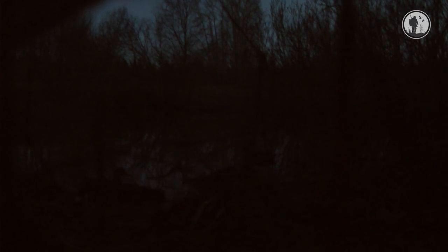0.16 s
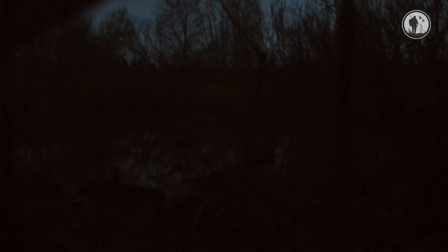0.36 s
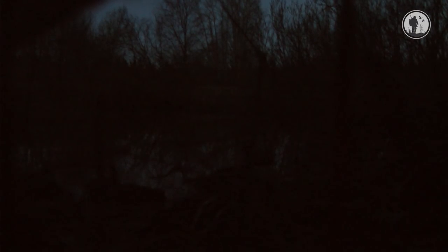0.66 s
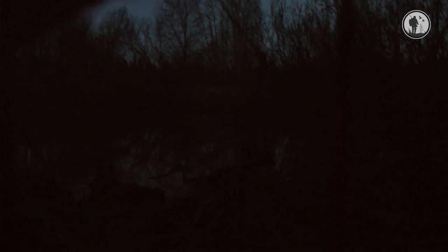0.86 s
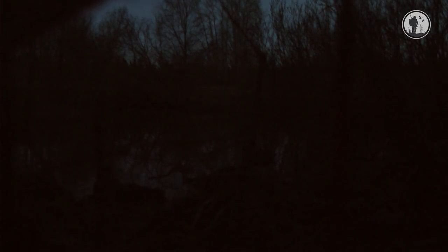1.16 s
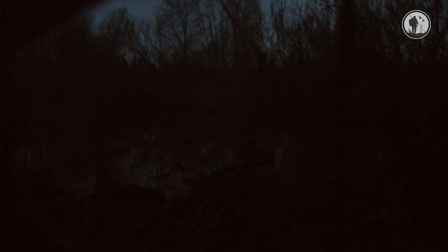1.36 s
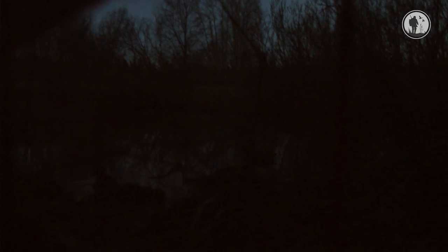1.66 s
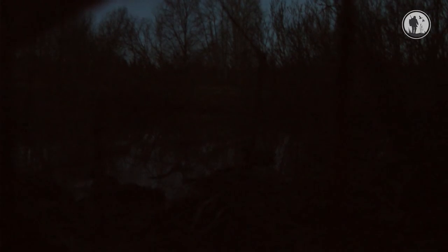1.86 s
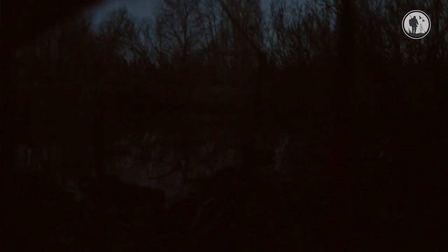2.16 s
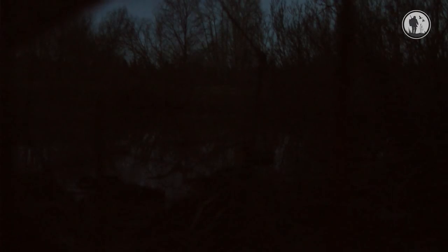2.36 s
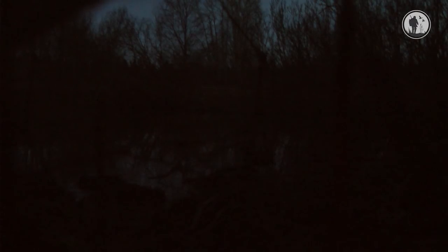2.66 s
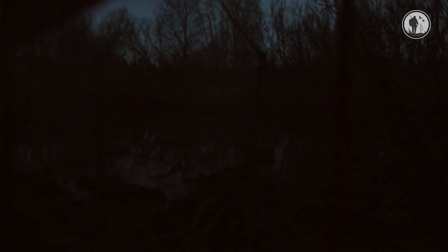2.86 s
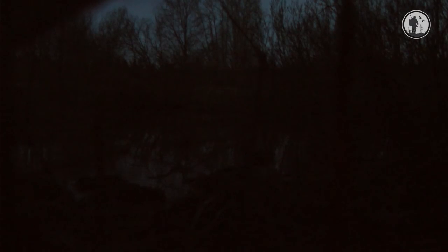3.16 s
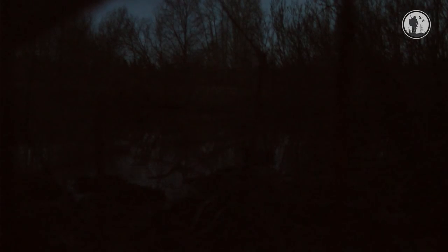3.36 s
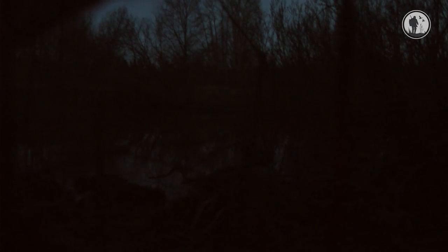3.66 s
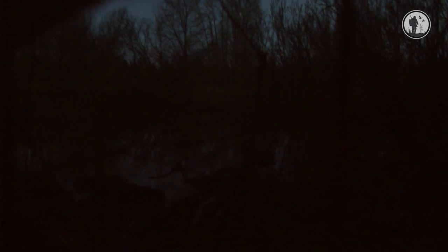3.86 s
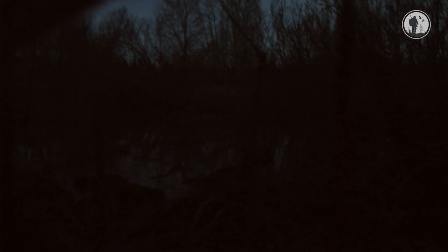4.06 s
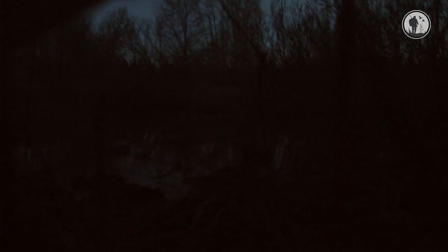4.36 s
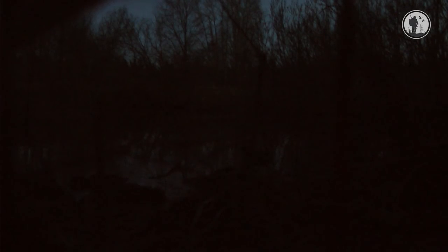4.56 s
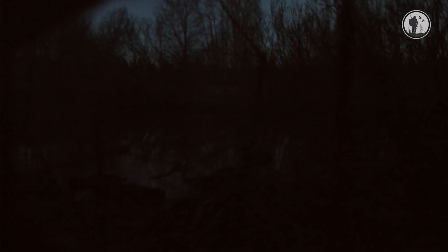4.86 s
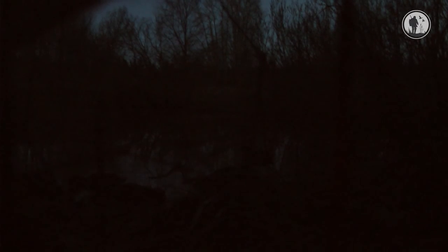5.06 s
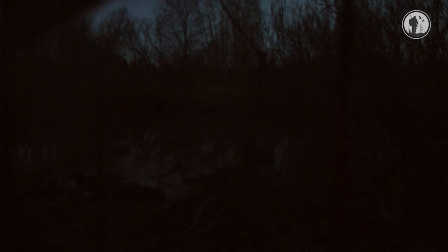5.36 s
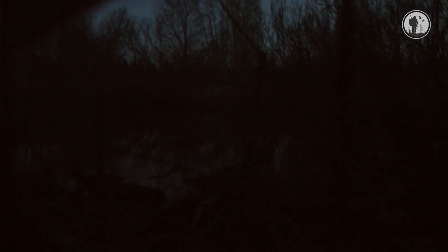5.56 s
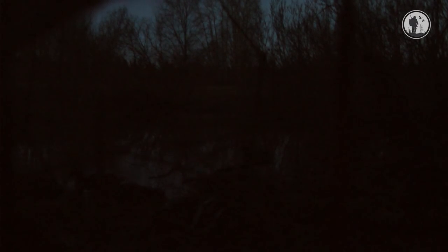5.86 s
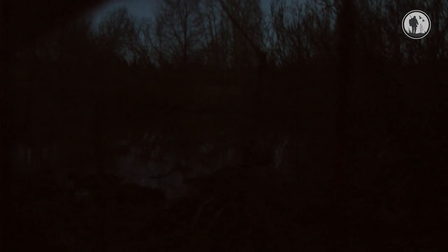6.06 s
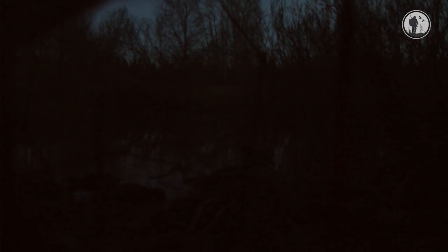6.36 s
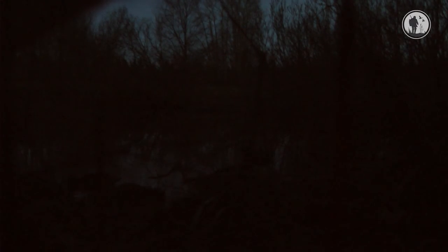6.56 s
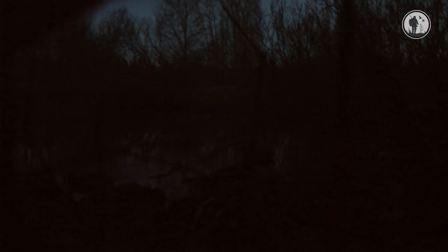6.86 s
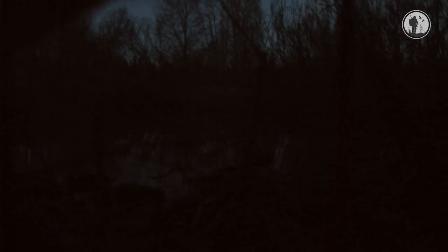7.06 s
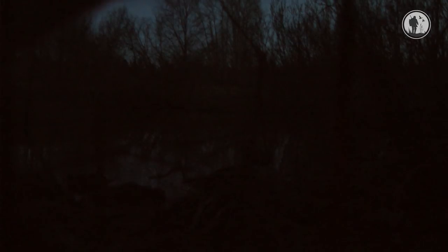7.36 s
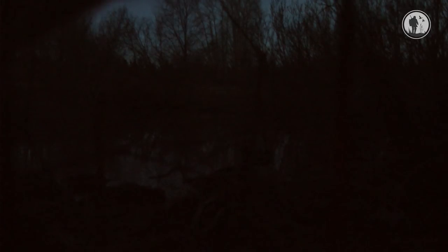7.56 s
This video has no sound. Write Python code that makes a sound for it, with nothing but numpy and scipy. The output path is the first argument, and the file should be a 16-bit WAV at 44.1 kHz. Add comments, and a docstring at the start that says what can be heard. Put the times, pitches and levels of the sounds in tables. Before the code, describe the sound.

A hen duck quacks about twenty times in quick succession, close, centered and dry, turning lower and raspier as she goes. Before she starts, far ducks call and a small bird trills in rising chirps, lightly echoing among the trees. High twitters fade under the quacking, with a few sharp ticks and a faint steady hum. Two small splashes and the returning trill finish it.

```python
"""Dawn in flooded woods, with a thin hum all the way through. At first, over a low drone, far ducks
rasp, small birds whistle among the trunks and one bird trills in rising chirps. After a second a hen
duck close by starts a long, fast run of quacks: membranes in her throat pulse, and her throat and bill
shape the buzz. The drone stops, the whistles thin out and she grows hoarse. A few dry ticks pass;
at the end come two soft splashes and the trill again."""
import sys
import numpy as np
from scipy import signal
from scipy.fft import rfft, irfft
from scipy.io import wavfile
from scipy.ndimage import uniform_filter1d

SR = 44100
rng = np.random.default_rng(int(sys.argv[2]) if len(sys.argv) > 2 else 0)


def wrap_up_sound(samples):
    """Save the sound to the file named by the first command line argument, as 16-bit audio."""
    columns = np.atleast_2d(samples).T
    # keep every value between -1 and 1, then stretch to whole-number steps
    tamed = np.clip(columns, -1, 1)
    steps = np.round(tamed * 32767).astype(np.int16)
    wavfile.write(sys.argv[1], SR, steps)


N = 339570


def amp(db):
    """Turns decibels into a gain."""
    return 10 ** (np.asarray(db) / 20)


def evened(x):
    """Scales x to an average power of 1."""
    return x / np.sqrt(np.mean(x ** 2) + 1e-20)


def at_pitch(points, hz):
    """Reads a curve at the given frequencies."""
    f, value = np.transpose(points)
    return np.interp(np.log(hz + 1), np.log(f + 1), value)


def at_time(points, s):
    """Reads a curve at the given times."""
    return np.interp(s, *np.transpose(points))


def add(mix, start_s, sound):
    """Adds a sound to the mix at start_s."""
    part = mix[round(start_s * SR):][:len(sound)]
    part += sound[:len(part)]


def arch(progress, top):
    """How far progress lies before and after the top, each from 0 to 1."""
    top = np.clip(top, .05, .95)
    return np.maximum(1 - progress / top, 0), np.maximum((progress - top) / (1 - top), 0)


def resonate(x, hz, width_hz):
    """A resonance: shifts hz down to zero, smooths, and shifts back."""
    turn = np.exp(2j * np.pi * hz * np.arange(len(x)) / SR)
    decay = np.exp(-np.pi * width_hz / SR)
    return 2 * (turn * signal.lfilter([1 - decay], [1, -decay], x / turn)).real


def colour(x, spectrum, lo_hz, hi_hz, steep=20):
    """Shapes x with one band of a spectrum, at power 1."""
    hz = np.fft.rfftfreq(len(x), 1 / SR) + 1
    band = 1 / np.sqrt((1 + (lo_hz / hz) ** steep) * (1 + (hz / hi_hz) ** steep))
    return evened(irfft(rfft(x) * amp(at_pitch(spectrum, hz)) * band, len(x)))


def noise(spectrum, patchy_db):
    """Stereo noise with drifting louder and softer patches."""
    # how alike left and right are: pitch_hz, likeness (1 = the same)
    likeness = [(30, 1), (125, 0.96), (500, 0.44), (2000, 0.96), (8000, 0.91), (14000, 0.34)]
    hz = np.fft.rfftfreq(2048, 1 / SR)
    a, b, c, d, patches = rng.standard_normal((N // 512 + 5, 1025, 5)).T
    patches = evened(uniform_filter1d(uniform_filter1d(patches, size=16, axis=0), size=6, axis=1))
    same = np.clip(at_pitch(likeness, hz), -1, 1)[:, None]
    left = a + 1j * b
    right = same * left + np.sqrt(1 - same ** 2) * (c + 1j * d)
    frames = np.array([left, right]) * amp(at_pitch(spectrum, hz)[:, None] + patchy_db * patches)
    return evened(signal.istft(frames, nperseg=2048, noverlap=1536)[1][:, :N])


def still_air():
    """A soft, even wash of noise."""
    # colour of the air: pitch_hz, level_db
    spectrum = [(12, -93), (20, -3), (74, -11), (191, -1.5), (324, -2), (393, -6.5), (1160, -11),
                (1380, -16), (1720, -9), (2920, -9), (4070, -16.5), (6720, -47), (15500, -31)]
    return amp(-60.5) * noise(spectrum, patchy_db=2)


def drone(t, end_s=2.56):
    """Two low, wobbling tones and a rumble that stop short."""
    # the tones: pitch_hz, level_db
    pitches = [(49, -53), (81, -64.5)]
    # colour of the rumble: pitch_hz, level_db
    spectrum = [(20, -11), (40, -50), (62, -0.5), (100, 5), (125, -2.5), (200, -3.5), (300, -17.5),
                (600, -17), (1300, -14.5), (2500, -38)]
    wobble = .22 * np.sin(2 * np.pi * 2.21 * t)
    tones = sum(amp(db) * np.sqrt(2) * np.sin(2 * np.pi * (hz * t + wobble)) for hz, db in pitches)
    rumble = amp(-51) * noise(spectrum, patchy_db=4.5)
    return (tones + rumble) * np.clip((end_s - t) / .023, 0, 1)


def hiss(t):
    """High noise that dips, swells and fades."""
    # loudness of the hiss: time_s, level_db
    levels = [(0, -62), (.3, -78), (.7, -74), (2.5, -61), (3.3, -66), (3.9, -76)]
    return amp(at_time(levels, t)) * noise([(2000, -15), (5000, 14.5), (15000, 12)], patchy_db=3.5)


def hum(t):
    """Two thin tones; a narrow band of noise around each makes it waver."""
    # the tones: pitch_hz, level_db
    tones = [(737, -64.5), (1325, -88)]
    out = np.zeros(N)
    for hz, db in tones:
        waver = evened(resonate(rng.standard_normal(N), hz, width_hz=14))
        out += amp(db) * (np.sin(2 * np.pi * hz * t) + .4 * waver)
    return out


def woods(x, ring_s, spread):
    """Echoes off the trunks: many small copies, partly different left and right."""
    size = SR // 2
    taps = np.zeros((2, size))
    delays = np.arange(200, size - 20, 20) + rng.integers(0, 20, (2, (size - 201) // 20))
    np.put_along_axis(taps, delays, rng.choice([-1., 1.], delays.shape), 1)
    fade = amp(-60 * np.arange(size) / SR / ring_s)
    echoes = (taps[0] + spread * taps[1] * np.array([[1], [-1]])) * fade
    return signal.fftconvolve(x[None], echoes / np.linalg.norm(echoes[0]), axes=1)[:, :N]


def ticks():
    """Dry ticks: bright noise that dies almost at once."""
    # each tick: start_s, level_db
    hits = [(2.9149, -35), (2.9756, -32), (4.969, -43), (5.8077, -29)]
    out, t = np.zeros(N), np.arange(400) / SR
    for start_s, db in hits:
        bright = signal.lfilter([1, 0, -1], [1, -.3], rng.standard_normal(len(t))) / 3
        add(out, start_s, amp(db - 60 * t / .0057) * bright)
    return out


def splashes():
    """Soft splashes: short, dull puffs of noise."""
    # each splash: start_s, length_s, level_db
    plops = [(7.165, 0.042, -47), (7.48, 0.042, -50.5)]
    out = np.zeros(N)
    for start_s, length_s, db in plops:
        white = rng.standard_normal(round(length_s * SR))
        puff = colour(white, [(100, 22), (4000, -12)], lo_hz=256, hi_hz=1290, steep=16)
        add(out, start_s, amp(db) * puff * np.hanning(len(puff)))
    return out


def whistle(hz, level_db, taper, fuzz, overtones=None):
    """A bird's tone; taper softens its ends and fuzz makes its level flutter."""
    # a nearly pure tone: pitch_multiple, level_db
    nearly_pure = [(1, 0), (2, -32), (3, -40)]
    turns = np.cumsum(hz) / SR
    tone = sum(amp(db) * np.sin(2 * np.pi * k * turns) * (k * hz < SR / 2.2)
               for k, db in overtones or nearly_pure)
    drift = uniform_filter1d(uniform_filter1d(rng.standard_normal(len(hz)), size=90), size=90)
    flutter = evened(1 + fuzz * evened(drift))
    return np.sqrt(2) * amp(level_db) * tone * flutter * signal.windows.tukey(len(hz), taper)


def glides(rows, taper, fuzz, fade_db):
    """One sliding whistle for each row; a bend over 1 makes the slide come late."""
    out = np.zeros(N)
    for start_s, length_s, start_hz, end_hz, db, bend in rows:
        progress = np.arange(0, 1, 1 / (length_s * SR))
        hz = start_hz + (end_hz - start_hz) * progress ** bend
        add(out, start_s, whistle(hz, db - fade_db * (progress - .5), taper, fuzz))
    return out


def squeals():
    """Far squeals and whistles, blurred by the trees."""
    # each call: start_s, length_s, start_hz, end_hz, level_db, bend
    calls = [ (.03, 0.24, 1400, 1817, -47.5, 0.41), (.09, 0.071, 3530, 4100, -53, 1.05),
             (.18, 0.044, 3120, 2960, -53, 1), (.28, 0.046, 3100, 4430, -46, 1.55),
             (.315, 0.097, 4470, 4350, -56.5, 0.64), (.4, 0.26, 4460, 4440, -72, 1.3),
             (.328, 0.039, 4450, 3000, -48, 0.34), (.36, 0.07, 3570, 3010, -51.5, 0.9),
             (.285, 0.049, 483, 660, -52.5, 0.85), (.64, 0.044, 466, 720, -55, 0.94),
             (.81, 0.16, 5030, 3700, -58, 0.61), (1.21, 0.03, 4350, 4060, -46, 1.1),
             (1.28, 0.032, 4300, 4500, -47.5, 0.19), (1.36, 0.069, 4450, 4410, -50, .2),
             (1.493, 0.008, 5950, 3500, -40, 0.53), (1.524, 0.021, 3900, 5870, -46, 2),
             (1.985, 0.025, 5500, 4160, -42, 1.15), (2.26, 0.11, 3670, 2785, -44, 0.45),
             (2.27, 0.044, 8260, 7350, -50, 1.4), (2.84, 0.069, 3800, 3686, -57, 0.84),
             (2.885, 0.053, 2950, 6150, -48, 4.9), (3.13, 0.06, 7520, 7240, -59, 1.1),
             (3.19, 0.021, 7300, 4140, -55, 0.82), (3.222, 0.018, 7360, 4270, -54, 1.5),
             (3.17, 0.033, 4640, 3080, -56, 3.7), (3.76, 0.042, 3700, 2640, -58.5, 2.2),
             (5.2, 0.12, 3000, 2800, -68, 2), (5.49, 0.18, 3100, 3400, -74, 0.37),
             (6.07, 0.032, 3570, 3560, -68, 1)]
    return glides(calls, taper=.5, fuzz=.9, fade_db=12)


def twitter():
    """Tiny, steep chirps scattered at random, high in the trees."""
    # the loudest a chirp can be: time_s, level_db
    levels = [(1.4, -92), (1.5, -56), (1.75, -46.5), (2.05, -57), (2.3, -53), (2.6, -61), (3.0, -56),
              (3.3, -56)]
    out, progress = np.zeros(N), np.linspace(0, 1, 600)
    for when, pitch, slide, softness in rng.random((420, 4)):
        start_s = 1.4 + 1.9 * when
        hz = (2800 + 5200 * pitch) * (1 + .5 * (slide - .5) * progress)
        add(out, start_s, whistle(hz, at_time(levels, start_s) - 6 * softness, taper=.8, fuzz=1))
    return out


def squeak(length_s=.112, top_hz=2470):
    """One rich squeak whose pitch rises, holds and falls."""
    # its overtones: pitch_multiple, level_db
    overtones = [(1, -4), (2, 3), (3, 1), (4, -11), (5, -19), (6, -13)]
    before, after = arch(np.arange(0, 1, 1 / (length_s * SR)), top=.6)
    hz = top_hz * (1 - .15 * (before + after) ** 4)
    return whistle(hz, level_db=-51, taper=.5, fuzz=.3, overtones=overtones)


def trill(chirp_start_hz=2532, gap_s=.0018):
    """A bird sings in groups: a swelling lead-in, then quick rising chirps."""
    # each group: start_s, lead_s, lead_start_hz, lead_bend, lead_db, chirp_count, top_hz, chirp_db
    groups = [(.512, 0.018, 2540, 1.04, -45, 2, 3520, -37.5), (0.644, .05, 2200, 2.3, -40.5, 2, 3650, -32),
              (0.781, 0.043, 2334, 1.17, -35, 2, 3440, -27.5),
              (.908, .034, 2410, 1.5, -32.5, 2, 3610, -26.5), (1.02, .032, 2650, 1.3, -30.5, 0, 3283, -28),
              (1.504, 0.017, 3080, 1.1, -42.5, 1, 3380, -41),
              (7.501, .041, 2230, 2.94, -38.5, 3, 3590, -31.5), (7.631, .041, 2370, 2, -34.5, 2, 3590, -26)]
    leads, chirps = [], []
    for start_s, lead_s, lead_hz, bend, lead_db, count, top_hz, chirp_db in groups:
        leads.append((start_s, lead_s, lead_hz, top_hz, lead_db, bend))
        for k in range(round(count)):  # each chirp comes sooner, and tires: shorter, lower, softer
            chirp_s = start_s + lead_s + gap_s + k * (.023 - .0015 * k)
            length_s = .01394 - .0007 * k
            chirps.append((chirp_s, length_s, chirp_start_hz, top_hz - 151 * k, chirp_db - 2.5 * k, .957))
    return glides(leads, taper=.4, fuzz=.1, fade_db=-18) + glides(chirps, taper=.7, fuzz=.1, fade_db=0)


def warble(start_s, length_s=.44, dip_width_s=.009):
    """The trill runs out in a climbing, fading whistle with short, loud dips in pitch."""
    # each dip: time_s, depth_hz, swell_db
    dip_rows = [(1.063, 180, 11.5), (1.082, 150, 3), (1.137, 302, 15), (1.176, 91.5, 1), (1.213, 505, 13.5),
                (1.292, 195, 11)]
    dip_s, depth_hz, swell_db = np.transpose(dip_rows)
    t = np.arange(0, length_s, 1 / SR)
    dips = np.exp(-((t[:, None] + start_s - dip_s) / dip_width_s) ** 2)
    hz = 3370 + 466 * t / length_s - dips @ depth_hz
    level_db = -38.5 - 11 * t / length_s + dips @ swell_db
    return whistle(hz, level_db, taper=.12, fuzz=.6)


def birds(squeak_s=2.578, warble_s=1.05):
    """All the small birds together."""
    out = trill() + squeals()
    add(out, squeak_s, squeak())
    add(out, warble_s, warble(warble_s))
    return out + twitter()


def rasp(turns, clear_share, burst, uneven_db):
    """A duck's membranes pulse unevenly, each with a puff of air. Gives the mix, and the puffs alone."""
    chance = np.clip(rng.standard_normal(int(turns[-1]) + 2), -1.4, 1.4)
    strength = amp(uneven_db * chance)[(turns + .5).astype(int)]
    pulses = sum(np.cos(2 * np.pi * k * (turns + k / 40)) for k in range(3, 13))  # k / 40 smears them
    puffs = (.88 + np.exp(-(turns % 1) / burst)) * rng.standard_normal(len(turns))
    buzz = np.sqrt(clear_share) * evened(pulses) + np.sqrt(1 - clear_share) * evened(puffs)
    return strength * buzz, strength * puffs


def far_ducks(pulse_hz=215, rise_db=20.5, fall_db=4.5):
    """Distance leaves only two throat resonances of each duck's rasp."""
    # each call: start_s, length_s, top_place (0-1), level_db
    calls = [(0.081, 0.31, 0.44, -33), (0.362, 0.23, 0.28, -41.5), (0.964, 0.28, 0.37, -33.5),
             (1.426, .12, 0.8, -36.5), (1.705, 0.089, 1, -37)]
    # throat resonances: pitch_hz, width_hz, level_db
    resonances = [(2076, 224, 20.5), (2258, 260, 22)]
    out = np.zeros(N)
    for start_s, length_s, top, top_db in calls:
        t = np.arange(0, length_s, 1 / SR)
        before, after = arch(t / length_s, top)
        buzz, _ = rasp(t * pulse_hz, clear_share=.1, burst=.38, uneven_db=3)
        throat = sum(amp(db) * resonate(resonate(buzz, hz, width), hz, width)
                     for hz, width, db in resonances)
        level = amp(top_db - rise_db * before - fall_db * after)
        add(out, start_s, level * evened(throat) * signal.windows.tukey(len(t), .1))
    return out


def envelope(t, from_top, attack_s, attack_db, release_s, release_db, droop_db):
    """A level in dB that rises, droops away from the top of the quack, then falls."""
    rise = np.maximum(1 - t / attack_s, 0)
    fall = np.maximum(1 - (t[-1] - t) / release_s, 0)
    return -attack_db * rise ** 1.58 - release_db * fall ** 1.4 - droop_db * from_top


def hen_voice(start_s, turns, tone_db):
    """The membranes give clear low tones with breath. Gives that voice, the buzz and the puffs."""
    # low tones (the half steps come from strong-weak pulses): pitch_multiple, level_db
    low_tones = [(1, 1), (1.5, -16), (2, -3.5), (2.5, -24), (3, -14)]
    # breath noise as she grows hoarse: time_s, level_db
    hoarseness = [(1.3, 4), (1.6, -14.5), (2.5, -12.5), (3.3, -7.5), (5.1, -3.5), (5.4, -3.5), (7.1, -5),
                  (7.4, 3.5)]
    # colour of the breath: pitch_hz, level_db
    breath_colour = [(200, -18), (330, 0.5), (650, 0), (1000, -2.5), (1250, -0.5), (1420, -30)]
    # how much of the buzz is clean pulses: time_s, share (0-1)
    clearness = [(1.3, .08), (1.6, .4), (2.5, .35), (3.3, .2), (5.1, .17), (5.4, .22), (7.1, .17),
                 (7.4, .08)]
    tones = sum(amp(db + tone_db) * np.sqrt(2) * np.cos(2 * np.pi * k * turns) for k, db in low_tones)
    buzz, puffs = rasp(turns, at_time(clearness, start_s), burst=.67, uneven_db=2.5)
    breath = colour(puffs, breath_colour, lo_hz=198, hi_hz=1490, steep=12)
    return tones + amp(at_time(hoarseness, start_s)) * breath, buzz, puffs


def throat_bill_nose(start_s, aside, buzz, puffs):
    """Throat, bill and nose each shape a band of the rasp; the colour changes as her head turns."""
    # throat and bill, head aside or facing us: pitch_hz, level_db
    aside_mouth = [(1350, 3), (1530, -2.5), (1750, 7.5), (2150, -3), (2590, -11), (2950, -2), (3250, -4),
                   (3700, -18), (4250, -22.5)]
    facing_mouth = [(1300, -53), (1470, -7.5), (1750, 7), (2050, 6.5), (2380, -3), (2600, -11.5),
                    (2800, -5), (3200, -11.5), (3600, -26.5), (4150, -38)]
    # nasal treble, aside, later aside (narrower bands) or facing us: pitch_hz, level_db
    aside_nose = [(3600, 4), (4200, -6.5), (4800, -7.5), (5300, -6), (5800, -5), (6330, -1.5), (7290, -2.5),
                  (7900, -20), (8600, -12.5), (9800, -16.5), (12500, -28), (15500, -41)]
    late_nose = [(3600, -27), (4500, -10), (5200, -8.5), (5800, -1.5), (6500, 1.5), (7300, -9.5),
                 (8500, -22), (9900, -10), (11000, -24), (12500, -33), (15500, -45)]
    facing_nose = [(3600, -11), (4250, -16.5), (4600, -4.5), (5340, -4), (6050, -15.5), (6500, -12),
                   (7350, -19.5), (7900, -19), (10300, -23.5), (12500, -35.5), (15500, -42)]
    mouth, nose = facing_mouth, facing_nose
    if aside:
        mouth, nose = aside_mouth, (late_nose if start_s > 4.1 else aside_nose)
    return (colour(buzz, mouth, lo_hz=1350, hi_hz=2450),
            colour(buzz, mouth, lo_hz=2460, hi_hz=4250),
            colour(puffs, nose, lo_hz=4250, hi_hz=18000))


def quack(start_s, length_s, top_hz, top, voice_db, throat_db, throat_fade_db, swell_db,
          bill_db, bill_fade_db):
    """One quack: a voice that arches in pitch, with rasp from throat, bill and nose."""
    # level shapes of voice, throat and bill: attack_s, attack_db, release_s, release_db, droop_db
    aside_shapes = [(0.025, 4.5, 0.025, 26, 5), (0.018, 17.5, 0.031, 14, 6), (0.039, 14, 0.044, 4.5, 22)]
    facing_shapes = [(.045, 5.8, 0.034, 24, 2.35), (.045, 23.2, 0.035, 15, 1), (.045, 22, .05, 18, 24)]
    aside = 1.5 < start_s < 5.25  # her head is turned away
    t = np.arange(0, length_s, 1 / SR)
    progress = t / length_s
    before, after = arch(progress, top)
    rise, fall = before ** 2.2, after ** 4.056
    from_top = rise + fall
    rise_share, fall_share, sag_share = (.3, .18, .13) if aside else (.33, .261, .085)
    hz = top_hz * (1 - rise_share * rise - fall_share * fall - sag_share * after ** 1.6)
    waver = evened(uniform_filter1d(rng.standard_normal(len(t)), size=250))
    turns = np.cumsum(hz * (1 + .008 * waver)) / SR
    tone_db = -(8 if aside else 10.5) * from_top  # the tones sink into the breath at both ends
    voice, buzz, puffs = hen_voice(start_s, turns, tone_db)
    throat, bill, nose = throat_bill_nose(start_s, aside, buzz, puffs)

    fade = np.clip(progress, .2, .75) - .5
    swell = np.exp(-((progress - .5) / .088) ** 2)
    flare_db = 9.5 * np.exp(-((length_s - .021 - t) / .0043) ** 2)  # just before the bill shuts
    voice_shape, throat_shape, bill_shape = aside_shapes if aside else facing_shapes
    voice_db += envelope(t, from_top, *voice_shape)
    throat_db += envelope(t, from_top, *throat_shape) - throat_fade_db * fade + swell_db * swell + flare_db
    bill_db += envelope(t, from_top, *bill_shape) - bill_fade_db * fade
    nose_db = (voice_db + throat_db + bill_db) / 3 - (13 if aside else 12)  # follows the whole effort
    sound = amp(voice_db) * voice + amp(throat_db) * throat + amp(bill_db) * bill + amp(nose_db) * nose
    return sound * signal.windows.tukey(len(t), .05)


def hen():
    """The hen's long, fast run of quacks."""
    # each quack: start_s, length_s, top_hz, top_place (0-1), voice_db, throat_db, throat_fade_db,
    # throat_swell_db, bill_db, bill_fade_db
    quacks = [ (1.239, 0.19, 339.2, 0.56, -41.5, -27.5, 5, 1.5, -35.5, -38),
              (1.545, 0.17, 459, .5, -29.5, -25, 6.5, 3, -23.5, 8),
              (1.797, 0.2, 474.5, 0.43, -28, -25, 6.5, 4.5, -24.5, 9.5),
              (2.076, .2, 459, 0.45, -28.5, -25, -0.5, 1, -26, 20),
              (2.353, .21, 445.6, 0.39, -29.5, -26.5, 7, 4, -28.5, 13),
              (2.647, 0.2, 432.5, 0.39, -31, -30.5, 10.5, 5.5, -28, 9.5),
              (2.941, 0.22, 416, 0.37, -32, -30.5, 11.5, 3.5, -28, 8),
              (3.248, 0.21, 415.3, 0.32, -33.5, -33, 14.5, 1, -30.5, 11),
              (3.552, 0.21, 411, .44, -34.5, -32.5, 18, 0.5, -31.5, 17),
              (3.857, 0.19, 406, 0.4, -34.5, -32, 19, 2.5, -33, 17),
              (4.14, 0.2, 398.8, 0.41, -36.5, -33.5, 12.5, -1, -31.5, 6.5),
              (4.433, 0.19, 389, 0.49, -36, -34.5, 12.5, 3.5, -29.5, 8),
              (4.719, 0.19, 386.2, 0.48, -36, -36.5, 7, 6.5, -30, 13),
              (5.017, 0.19, 398.6, 0.49, -36.5, -35.5, 16, 3, -29.5, 13),
              (5.298, .193, 404, .58, -35.5, -32, 15.5, -3, -22, 25),
              (5.583, 0.18, 395.7, 0.53, -35.5, -29, 15.5, 1.5, -24, 18),
              (5.869, 0.18, 381, 0.49, -36, -30, 15, 0, -23, 9),
              (6.139, 0.17, 387.2, 0.44, -35, -25, 12, -3, -23.5, 5),
              (6.405, 0.19, 384.2, 0.47, -35.5, -26, 18, 0, -24, 8),
              (6.697, 0.18, 385.2, 0.49, -35.5, -27, 13, 3, -24.5, 12),
              (6.989, 0.17, 360.2, .55, -36, -27, 10.5, -2, -25.5, 15),
              (7.313, 0.15, 324, 0.61, -41, -28.5, 10, 7.5, -29, 5)]
    out = np.zeros(N)
    for start_s, *settings in quacks:
        add(out, start_s, quack(start_s, *settings))
    return out


def scene():
    """The hen in the middle without echo, birds a little to the right; birds and far ducks echo."""
    t = np.arange(N) / SR
    song, quacks, far = birds(), hen(), far_ducks()
    far_echo = amp(-12) * woods(far, ring_s=.15, spread=.1)
    small_sounds = ticks() + splashes()
    song_echo = amp(-4.5) * woods(song, ring_s=.22, spread=.5)
    background = drone(t) + hiss(t) + hum(t) + still_air()
    return background + small_sounds + song * amp([[-1.6], [1.6]]) + song_echo + far + far_echo + quacks


def record(dry):
    """Cuts the very highest treble, above 15720 Hz."""
    low_pass = signal.firwin(1023, 15720, window=("kaiser", 9), fs=SR)
    return signal.oaconvolve(dry, low_pass[None], "same")


dry = scene()
out = record(dry)
wrap_up_sound(out)
```